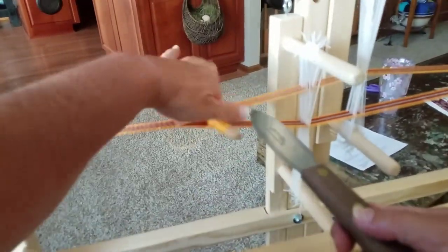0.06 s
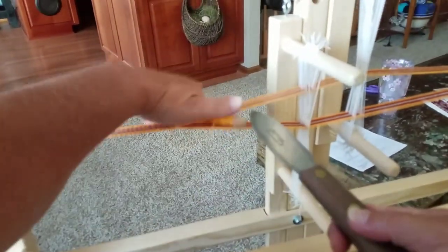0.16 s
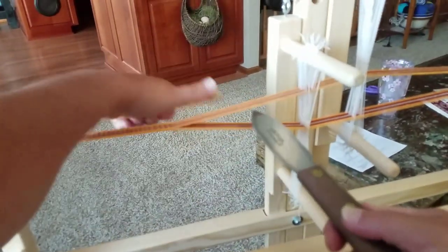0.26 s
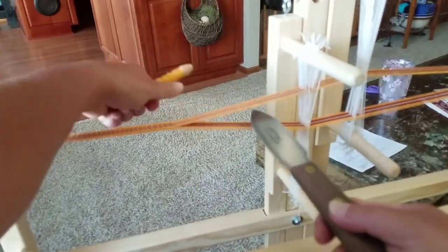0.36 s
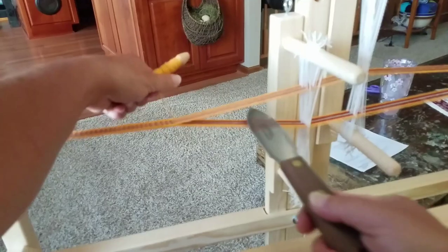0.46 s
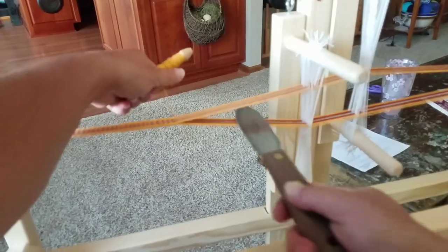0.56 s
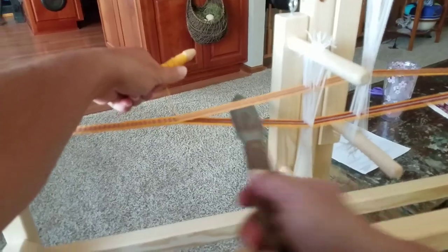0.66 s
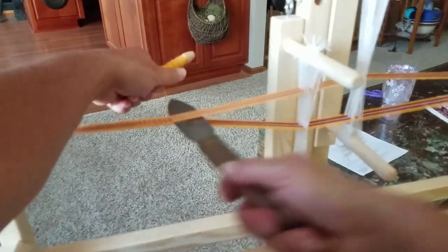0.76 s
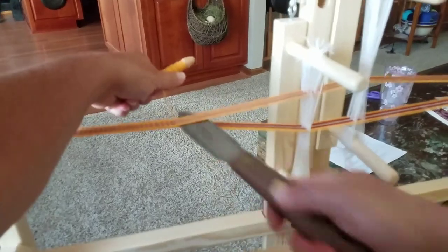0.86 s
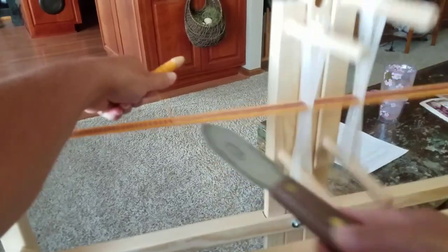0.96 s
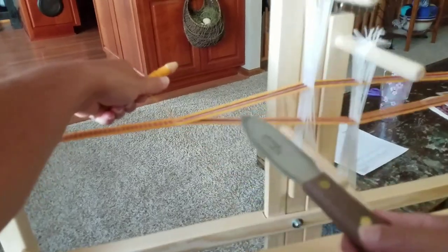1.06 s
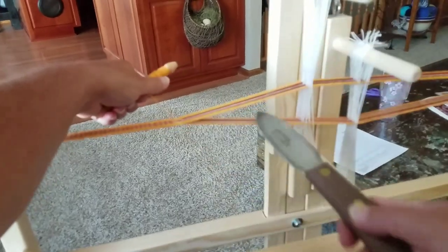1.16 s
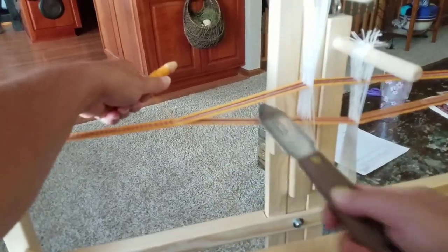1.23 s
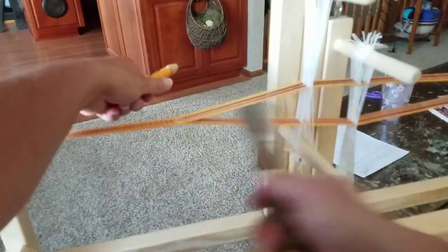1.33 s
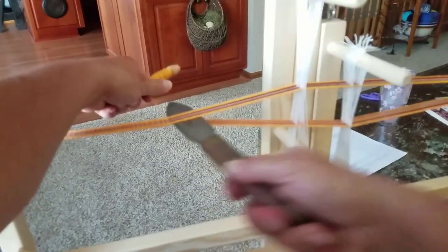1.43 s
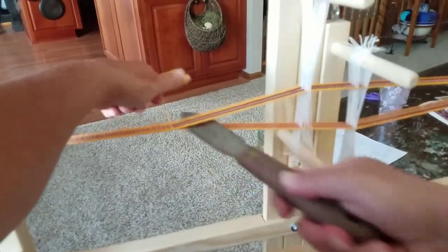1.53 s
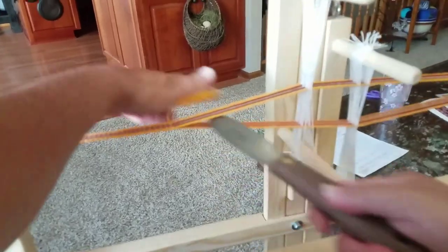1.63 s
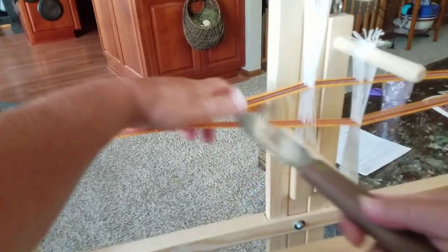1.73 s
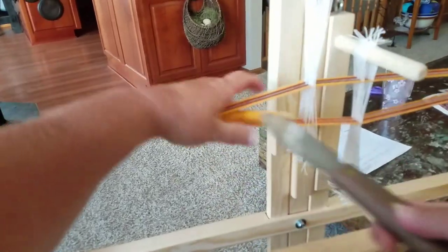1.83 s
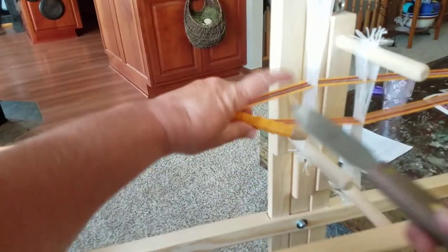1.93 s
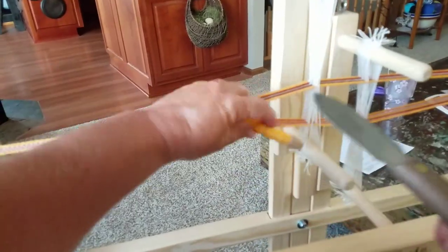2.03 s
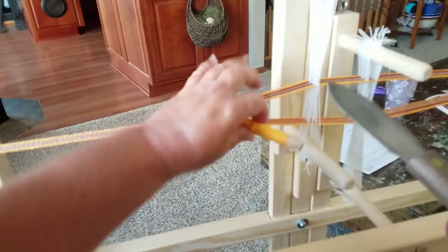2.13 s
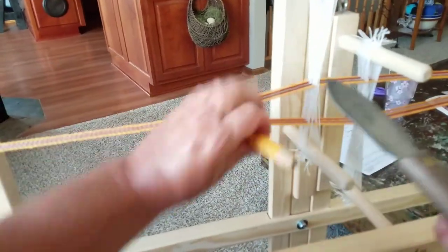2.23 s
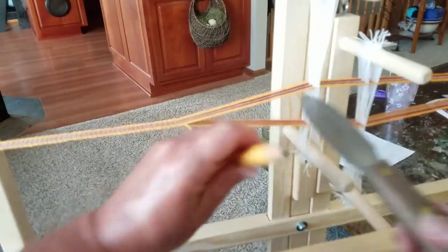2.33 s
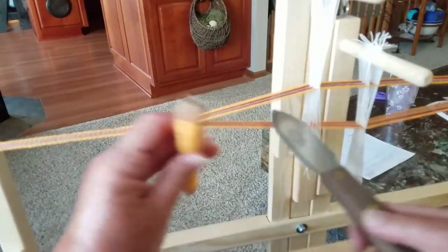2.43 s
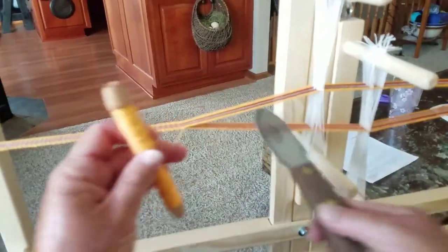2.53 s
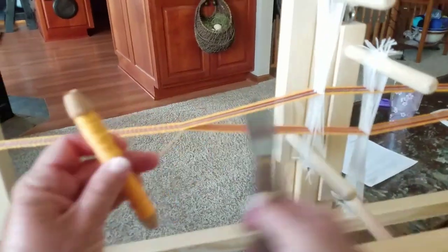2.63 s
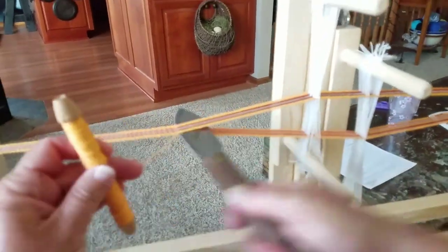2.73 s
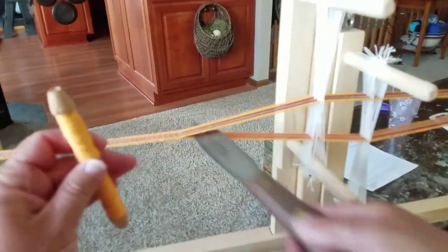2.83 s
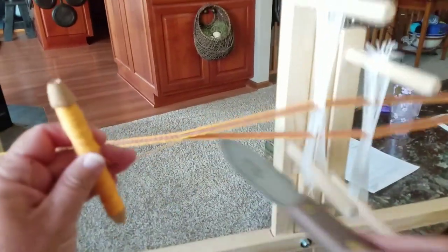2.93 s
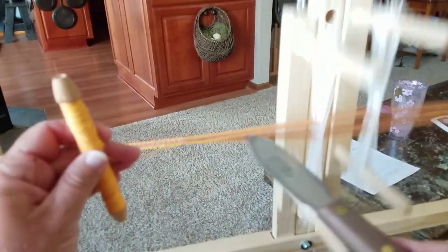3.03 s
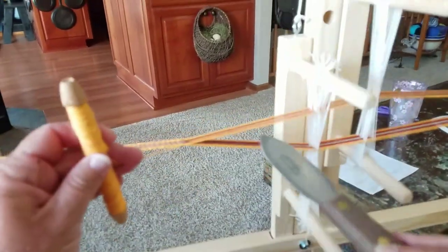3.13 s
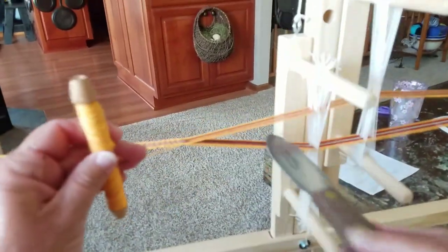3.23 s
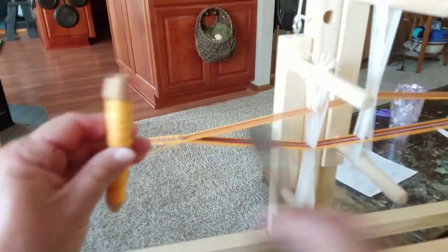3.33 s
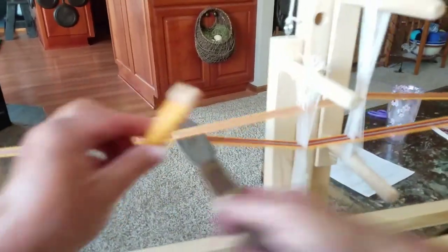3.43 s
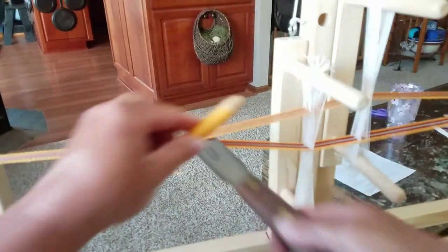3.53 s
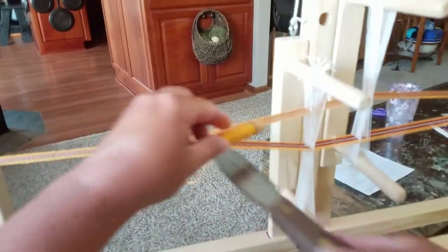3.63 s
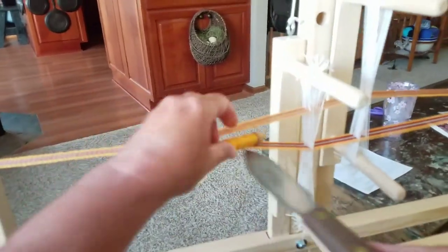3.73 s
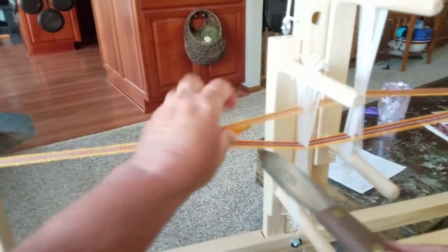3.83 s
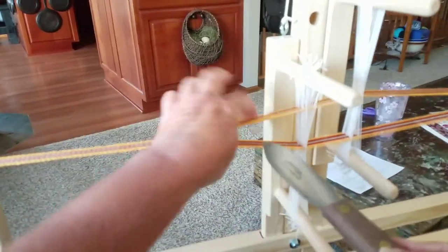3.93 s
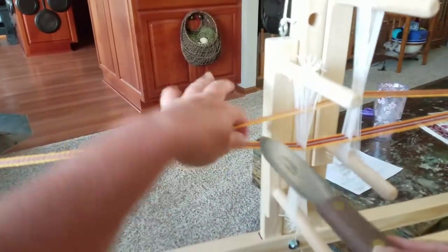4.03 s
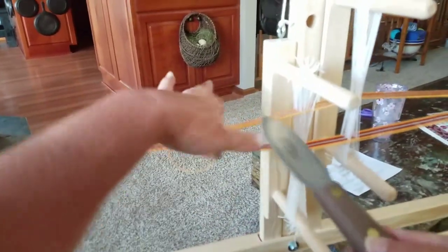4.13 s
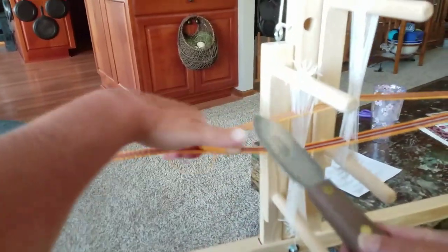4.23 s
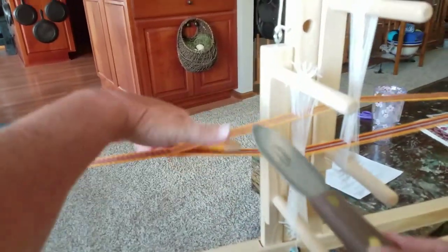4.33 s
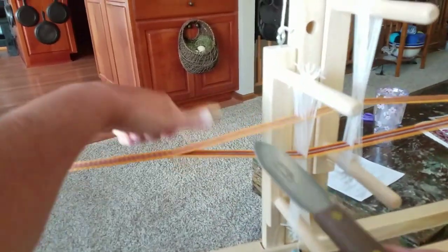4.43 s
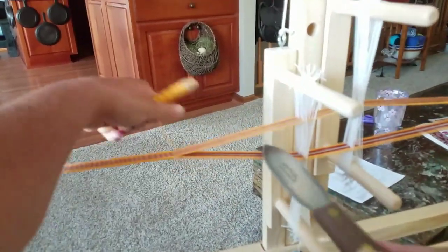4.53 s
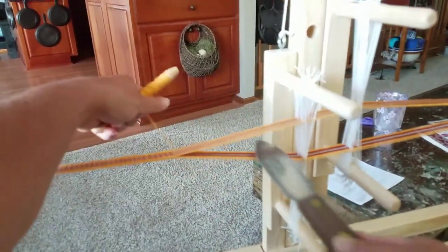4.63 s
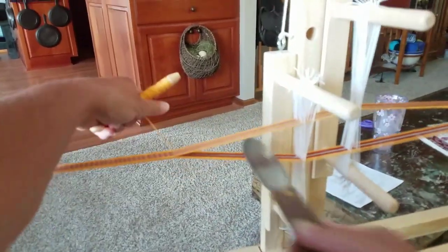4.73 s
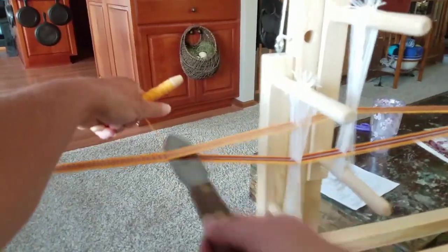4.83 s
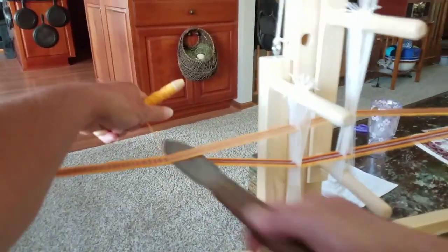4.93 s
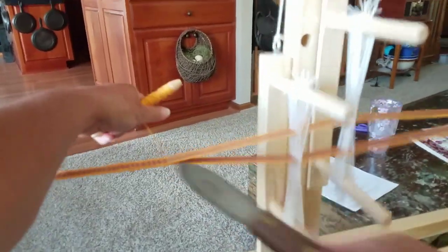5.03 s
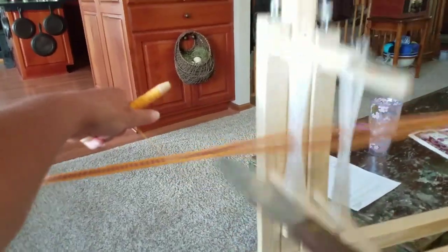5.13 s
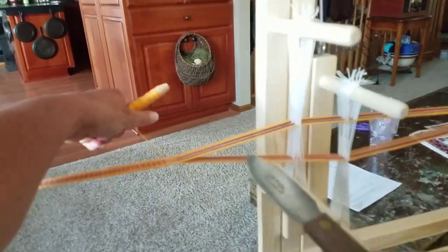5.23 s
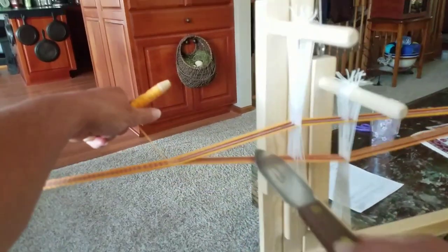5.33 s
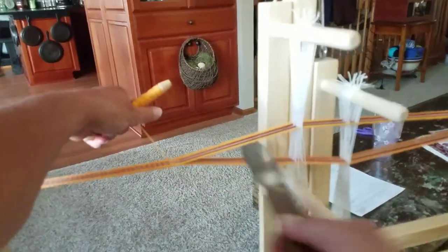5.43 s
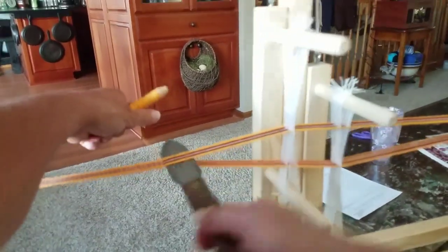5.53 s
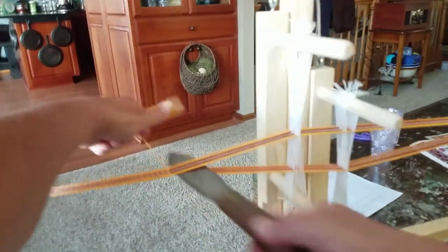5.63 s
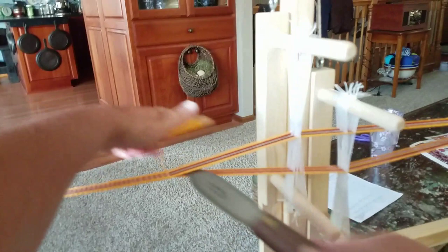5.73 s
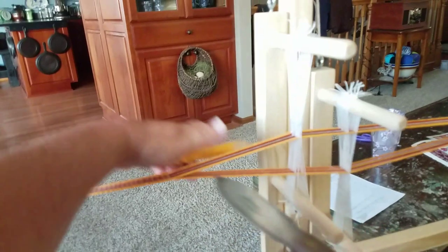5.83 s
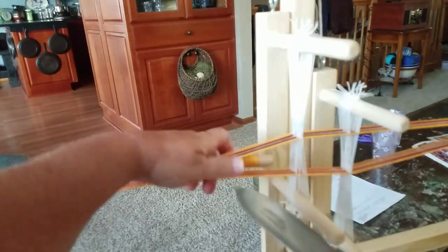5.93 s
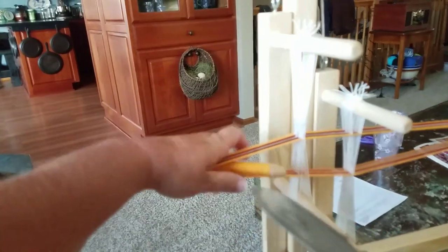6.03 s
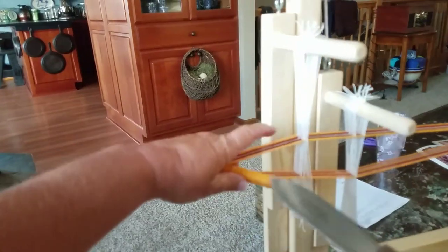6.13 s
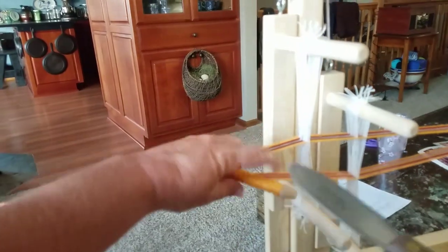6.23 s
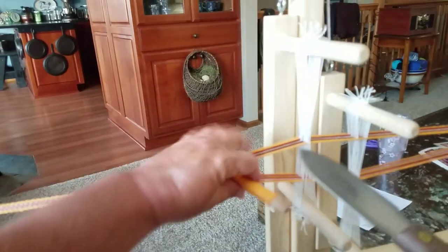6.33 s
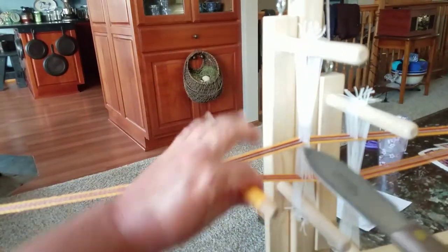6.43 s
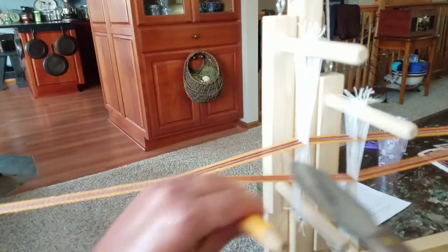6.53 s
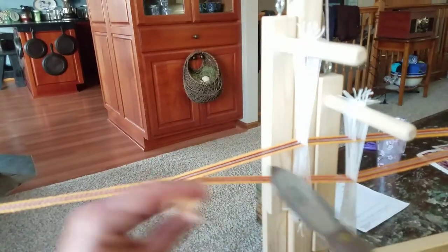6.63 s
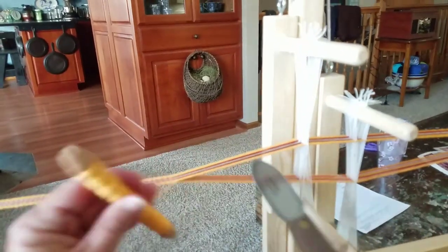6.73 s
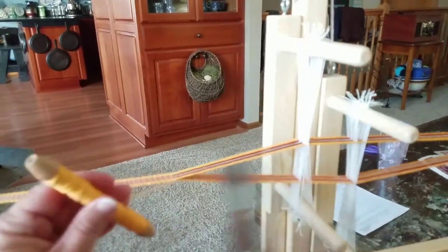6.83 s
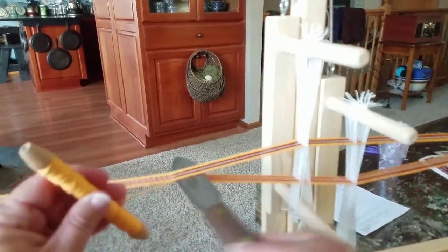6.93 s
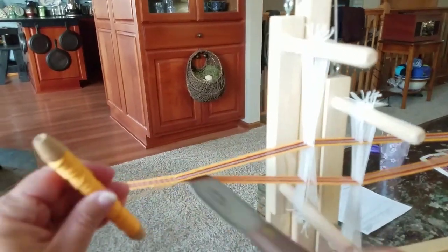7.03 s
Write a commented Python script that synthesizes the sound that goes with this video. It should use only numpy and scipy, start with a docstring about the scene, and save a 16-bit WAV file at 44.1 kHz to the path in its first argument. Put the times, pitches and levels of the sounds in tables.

```python
"""A small wooden loom weaves a band in a quiet, carpeted room. A knife-shaped beater swishes into the shed and
knocks the weft home: damped modes ring in the frame until the blade rebounds and checks most of the motion.
Between beats, shaped friction noise gives the scrape of heddles in the warp and the rustle of yarn;
the heddle bar hums and knocks, and blade and shuttle tick. A diffuse echo and still air surround the loom."""
import sys
import numpy as np
from scipy import signal
from scipy.fft import rfft, irfft
from scipy.io import wavfile
from scipy.ndimage import uniform_filter1d

SR = 44100
rng = np.random.default_rng(int(sys.argv[2]) if len(sys.argv) > 2 else 0)


def to_wav(sig):
    """Store sig (one row per channel, or 1-D mono) as 16-bit WAV at the path in sys.argv[1].

    Samples outside -1..1 are clipped; the rate is SR.
    """
    pcm = np.clip(np.atleast_2d(sig), -1, 1) * 32767
    pcm = np.round(pcm).astype(np.int16)
    wavfile.write(sys.argv[1], SR, pcm.T)  # frames by channels


N = 311346
T = np.arange(N) / SR
HZ = np.maximum(np.arange(N // 2 + 1) * SR / N, 1)
STROKE_T = T[:SR // 2]  # time axis of one struck sound, s
APART_HZ = 2250  # around this frequency the two ears' sounds of the loom become unrelated


def amp(db):
    """Level law: decibels to amplitude gain."""
    return 10 ** (np.asarray(db) / 20)


def unit(x):
    """Normalisation: scale to rms 1."""
    return x / np.sqrt(np.mean(x ** 2))


def colour(x, points):
    """Linear filtering: gain interpolated between (f/Hz, level/dB) points on a log-frequency axis."""
    hz, db = np.transpose(points)
    gain = amp(np.interp(np.log(HZ), np.log(hz), db))
    return irfft(rfft(x) * gain, N)


def grains(spread_db):
    """Granular friction: dense slips of fibre on fibre, their sizes scattered in dB."""
    size_db = spread_db * rng.standard_normal(N // 16 + 1)
    sizes = np.repeat(amp(size_db), 16)[:N]  # each size lasts 16 samples
    return sizes * rng.standard_normal((2, N))


def catches(depth_db):
    """Stick-slip: uneven gain of threads that catch and slip every few milliseconds."""
    unevenness = uniform_filter1d(rng.standard_normal(N), size=300)
    return amp(depth_db * unit(unevenness))


def stereo(pair, apart_hz):
    """Interaural coherence: two unrelated signals made alike in the bass, less and less above apart_hz."""
    alike = .85 / (1 + (HZ / apart_hz) ** 2)
    mid, side = rfft(pair) * np.sqrt([1 + alike, 1 - alike])
    return irfft(np.array([mid + side, mid - side]), N) / np.sqrt(2)


def friction(points, spread_db):
    """Broadband friction: steady rubbing with the given spectrum, rms 1."""
    return unit(colour(stereo(grains(spread_db), APART_HZ), points))


def ring(modes, tilt_db=0, detune=0):
    """Modal superposition: decaying sines of a struck object, high modes out of step between the ears."""
    out = 0
    for k, (hz, db, t60) in enumerate(modes):
        drift, skew = rng.standard_normal(2)
        lag = np.array([[.5], [-.5]]) * skew * min(hz / APART_HZ, 1) * 2  # phase, rad
        tilt = tilt_db * np.log2(hz / 600)  # tilt_db is per octave
        decay = amp(db + tilt - 60 * STROKE_T / t60)
        phase = 2 * np.pi * hz * (1 + detune * drift) * STROKE_T + lag
        out = out + (-1) ** k * decay * np.sin(phase)
    levels_db = np.array(modes)[:, 1]
    return out / np.sqrt(np.sum(amp(levels_db) ** 2) / 2)


def add(track, s, sound):
    """Linear superposition: mix a sound in at time s."""
    i = int(s * SR)
    track[:, i:i + sound.shape[1]] += sound[:, :N - i]


def swell(s, spread):
    """Gaussian envelope: a bell-shaped stroke around time s, with standard deviation spread in seconds."""
    return np.exp(-.5 * ((T - s) / spread) ** 2)


def pressed(t, hold, rise=.002, release=0.003, left_db=-14):
    """Contact damping: motion builds up, holds, and falls to left_db at the rebound."""
    held = np.exp(-np.maximum(t - hold, 0) / release)
    return np.clip(t / rise, 0, 1) * (held + amp(left_db) * (1 - held))


QUIET_DB, QUIET_APART_HZ = -63, 1030
# spectrum of the room's still air: (f/Hz, relative level per Hz/dB)
STILL_AIR_SPECTRUM = [(12, 7), (20, -24), (32, -15), (80, -15), (135, -6.5), (178, -13), (337, -4),
                      (511, -8.5), (674, -12.5), (914, -13.5), (1050, -16), (1140, -16), (2770, -21.5),
                      (15000, -31.5)]


def still_air():
    """Stationary noise: the steady, mostly low background of the room."""
    noise = stereo(rng.standard_normal((2, N)), QUIET_APART_HZ)
    return amp(QUIET_DB) * unit(colour(noise, STILL_AIR_SPECTRUM))


# yarn drawn off the shuttle: (t/s, level/dB, standard deviation of the stroke/s)
YARN_PULLS = [(0.196, -60.5, 0.014), (1.666, -66, 0.03), (2.208, -72.5, 0.14), (4.202, -62.5, 0.11),
              (4.378, -61.5, 0.04), (6.395, -64.5, 0.08), (6.475, -58, 0.021)]
# spectrum of yarn sliding over fingers and warp: (f/Hz, relative level per Hz/dB)
YARN_SPECTRUM = [(100, -30), (350, 10.5), (600, 5.5), (830, 5), (1200, 4), (1600, -9), (2800, -2),
                 (5000, -18), (8000, -15.5), (14500, -13.5)]


def yarn():
    """Stick-slip friction: yarn slides and catches in the fingers with each pull."""
    pull = sum(amp(db) * swell(s, spread) for s, db, spread in YARN_PULLS)
    return pull * catches(depth_db=1.5) * friction(YARN_SPECTRUM, spread_db=2.5)


# reverberation in overlapping bands: (centre f/Hz, t60/s, level/dB)
ROOM_BANDS = [(60, 0.38, -8), (143, 0.44, 6), (244, 0.4, -2.5), (540, 0.33, -7), (1020, 0.38, -10),
              (2160, 0.41, -18.5), (4530, 0.3, -6), (8000, 0.31, -9.5)]


def room(x, first_s=0.0059, apart_hz=700):
    """Diffuse reverberation: the left signal convolved with noise that decays at its own rate in each band."""
    air, echo = rfft(stereo(rng.standard_normal((2, N)), apart_hz)), 0
    centres = np.log([row[0] for row in ROOM_BANDS])
    for share, (hz, t60, db) in zip(np.eye(len(ROOM_BANDS)), ROOM_BANDS):
        onset = np.clip(T / first_s - 1, 0, 1)  # silent until first_s, full at twice that
        fade = amp(-60 * T / t60) * onset
        band = irfft(air * np.interp(np.log(HZ), centres, share), N)
        echo = echo + amp(db) * band * fade / np.sqrt(np.sum(fade ** 2))
    return signal.fftconvolve(x[:1], echo[:, :SR], axes=1)[:, :N]


# modes of the blade: (f/Hz, relative level/dB, t60/s)
BLADE_MODES = [(1012, -2, 0.046), (1490, -16, 0.018), (2054, 0.5, 0.053), (2350, -2.5, 0.066),
               (2600, -9, 0.037), (3450, -37, 0.023), (4126, -1.5, 0.042), (5450, -11, 0.063)]


def tap(ring_db, snap_db):
    """Impact excitation: a dry snap, a short woody clack and the modal ring of the blade."""
    snap, clack = rng.standard_normal((2, 2, len(STROKE_T)))
    wood = signal.butter(2, [600, 3400], "band", fs=SR, output="sos")
    clack = signal.sosfilt(wood, clack) * np.exp(-STROKE_T / .0035)
    body = amp(-13) * ring(BLADE_MODES, detune=.02) + clack
    return amp(ring_db) * body + amp(snap_db) * snap * np.exp(-STROKE_T / 0.0011)


FIRM_DB, USUAL_HOLD_S = -26, .02  # reference beat
HARDNESS_DB, HARDNESS_SLOPE = 0.2, 0.35  # tilt of a firm beat, dB per octave; its change per dB of force
CHATTER_DB, CHATTER_SLOPE = -31.5, 0.69  # thread chatter of a firm beat; dB per dB of force
REBOUND_DB, REBOUND_SLOPE_DB = -32, 24  # rebound click after the usual hold; gain per doubling of the hold
CHATTER_FADE_S, DOWEL_LAG_S = 0.03, 0.0074
SWISH_IN_DB, SWISH_RISE_S, SWISH_STOP_S = -42.5, 0.017, 0.0061  # the blade slides in
SWISH_OUT_DB, GRAZE_DB, WITHDRAW_S, WITHDRAW_SPREAD_S = -59.5, -55, 0.11, 0.034  # and is drawn back
# beats, a firm one before each change of shed and a light one after:
# (t/s, knock level/dB, time pressed home/s, dowel rattle level/dB)
BEATS = [(0.7385, -24.5, 0.017, -27.5), (1.3975, -33, 0.019, -46), (2.7030, -27.5, 0.023, -48),
         (3.3990, -35, 0.01, -58), (4.8545, -26, 0.02, -29), (5.5270, -36.5, 0.019, -44),
         (6.8927, -26.5, 0.02, -56)]
# modes of the frame under the warp: (f/Hz, relative level/dB, t60/s)
FRAME_MODES = [(117.9, -19, 0.73), (153.3, -27, 0.93), (178.4, -12.5, 0.37), (238.2, -3, 0.32),
               (332, -4, 0.62), (375.3, -5.5, 0.42), (486, 6, 0.1), (582, -0.5, 0.58), (679, 9.5, 0.066),
               (757.6, 5.5, 0.079), (854, -1.5, 0.18), (991, -7.5, 0.29), (1150, -20.5, 0.52),
               (1268, -10, 0.44), (1860, -26, .15), (2180, -16.5, 0.46), (2824, -9.5, 0.047),
               (4190, -19, 0.15)]
# modes of the loose warp dowel: (f/Hz, relative level/dB, t60/s)
DOWEL_MODES = [(993, -6, 0.1), (1598, 3.5, 0.077), (1660, -8, 0.13), (2150, -4, 0.13), (2586, -5, 0.069)]
# spectrum of the blade chattering on the threads: (f/Hz, relative level per Hz/dB)
CHATTER_SPECTRUM = [(50, -38), (120, -30), (250, -5.5), (700, 2.5), (1100, 6), (1380, -11), (1800, -2.5),
                    (2700, -10.5), (3500, -15), (5500, -23.5), (8000, -40.5), (15000, -37)]
# spectrum of the blade sliding along the threads: (f/Hz, relative level per Hz/dB)
SWISH_SPECTRUM = [(100, -16), (400, 9), (850, -1.5), (1250, 5), (1600, -6), (2600, 1), (4000, -10.5),
                  (5500, -11.5), (7500, -8.5), (10000, -16.5), (14500, -7)]


def beater():
    """Impact and sliding friction: a gathering swish, a knock with chattering threads, a softer swish back."""
    out, chatter, slide = np.zeros((2, N)), np.zeros((1, N)), np.zeros(N)
    for s, db, hold, rattle_db in BEATS:
        # a firmer beat is brighter and makes the threads chatter more
        force_db = db - FIRM_DB
        hard_db = HARDNESS_DB + HARDNESS_SLOPE * force_db
        chatter_db = CHATTER_DB + CHATTER_SLOPE * force_db
        # the stiffening warp limits the frame's swing
        swing = 1.8 * np.tanh(ring(FRAME_MODES, hard_db, detune=.012) / 1.4)
        add(out, s, amp(db) * swing * pressed(STROKE_T, hold, rise=0.00053, left_db=-15.5))
        buzzing = pressed(STROKE_T, hold, rise=0.0012, left_db=-7.0) * np.exp(-STROKE_T / CHATTER_FADE_S)
        add(chatter, s, amp(chatter_db) * buzzing[None])
        # the jerk runs down the warp and rattles the dowel a moment later
        rattle = ring(DOWEL_MODES, detune=0.0056) * pressed(STROKE_T, hold, rise=0.0059)
        add(out, s + DOWEL_LAG_S, amp(rattle_db) * rattle)
        # the blade clicks as it meets the weft
        add(out, s + 0.0019, tap(ring_db=-48, snap_db=SWISH_IN_DB))
        # the longer it is pressed, the harder it rebounds
        rebound_db = REBOUND_DB + REBOUND_SLOPE_DB * np.log2(hold / USUAL_HOLD_S)
        add(out, s + 0.96 * hold, tap(rebound_db, snap_db=-59))
        # on its way out it grazes the threads
        add(out, s + WITHDRAW_S, tap(GRAZE_DB, snap_db=-52))
        reach = np.abs(T - s) / np.where(T < s, SWISH_RISE_S, SWISH_STOP_S)
        slide += amp(SWISH_IN_DB) * np.exp(-reach ** 0.95)
        slide += amp(SWISH_OUT_DB) * swell(s + WITHDRAW_S, WITHDRAW_SPREAD_S)
    swish = friction(SWISH_SPECTRUM, spread_db=1.2)
    buzz = friction(CHATTER_SPECTRUM, spread_db=1.5)
    return out + chatter * buzz + slide * swish


SHED_RISE_S, SHED_FALL_S = 0.15, 0.093  # time to gain and to lose 20 dB
HUM_DB = 1  # peak hum of the bar relative to the scrape
BOUNCE_S, BOUNCE_DB = 0.022, -8.5  # spacing of the bar's bounces; level change at each
# changes of shed, fastest just as the bar seats: (t/s, scrape level/dB, knock level/dB)
SHEDS = [(1.0215, -41.5, -24.5), (3.039, -43, -31.5), (5.147, -41, -29)]
# spectrum of threads dragged through the heddles: (f/Hz, relative level per Hz/dB)
SCRAPE_SPECTRUM = [(100, -53), (230, -13), (380, 1), (600, -0.5), (1150, 3), (1400, -8), (2000, -2.5),
                   (3000, -8.5), (4500, -16.5), (8000, -17.5), (10000, -24.5), (14500, -17)]
# modes of the heddle bar: (f/Hz, relative level/dB, t60/s)
BAR_MODES = [(217, -23, 0.26), (526, 6, 0.061), (588, -0.5, 0.025), (1100, -19.5, 0.063), (1694, -3, 0.043),
             (2150, -2.5, 0.083), (2720, -7, 0.072), (3400, -9, 0.058)]
# slight spectral trim of the bar's sound: (f/Hz, level/dB)
BAR_TRIM = [(60, 0), (200, -0.5)]


def heddles():
    """Friction-driven resonance: uneven scraping sets the bar humming; it knocks as it seats and bounces twice."""
    scrape, hum, knocks = np.zeros(N), np.zeros(N), np.zeros((2, N))
    seat = pressed(STROKE_T, .008, rise=.003, left_db=-10)
    for s, scrape_db, knock_db in SHEDS:
        rise, fall = (s - T) / SHED_RISE_S, ((T - s) / SHED_FALL_S) ** 2
        speed = amp(-20 * np.where(T < s, rise, fall))
        scrape += amp(scrape_db) * speed
        # the bar hums mostly while the threads drag hard
        hum += amp(scrape_db + HUM_DB) * speed ** 1.4
        for k in range(3):
            knock = ring(BAR_MODES, tilt_db=-4.0, detune=0.0069) * seat
            add(knocks, s + k * BOUNCE_S, amp(knock_db + k * BOUNCE_DB) * knock)
    drive = rng.standard_normal((1, N))
    bar = unit(signal.fftconvolve(drive, ring(BAR_MODES), axes=1)[:, :N])
    rubbing = catches(depth_db=0.65) * scrape * friction(SCRAPE_SPECTRUM, spread_db=2.5)
    return rubbing + colour(hum * bar + knocks, BAR_TRIM)


# light taps of blade, bar and shuttle: (t/s, ring level/dB, snap level/dB)
TICKS = [(1.513, -37, -62), (3.0392, -30.5, -51), (4.085, -40.5, -49), (5.247, -53, -54),
         (5.6506, -41, -57), (5.7285, -40, -70), (6.7407, -63, -50)]


def ticks():
    """Light impacts: brief contacts, each with its own balance of ring and snap."""
    out = np.zeros((2, N))
    for s, ring_db, snap_db in TICKS:
        add(out, s, tap(ring_db, snap_db))
    return out


BUMP_FADE_S = 0.11
# soft bumps against the frame: (t/s, level/dB)
BUMPS = [(1.517, -53), (6.742, -50.5), (6.756, -53)]


def bumps():
    """Soft excitation: the frame's modes ring with less treble and an added exponential fade."""
    out = np.zeros((2, N))
    fade = np.exp(-STROKE_T / BUMP_FADE_S)
    for s, db in BUMPS:
        add(out, s, amp(db) * ring(FRAME_MODES, tilt_db=-1.0, detune=0.019) * fade)
    return out


# the right microphone is shaded from the loom: (f/Hz, left minus right level/dB)
EAR_SHADE = [(200, -.8), (700, .3), (1400, -.3), (2500, 2), (5000, 5.5), (8500, 13), (11000, 9.5),
             (15000, 8)]


def shaded(x):
    """Acoustic shadow: half the level difference raises the left ear, half lowers the right."""
    ears = [colour(ear, [(hz, side * db) for hz, db in EAR_SHADE]) for ear, side in zip(x, (.5, -.5))]
    return np.array(ears)


def scene():
    """Direct and reverberant fields: the loom close by, its echo, and the still room."""
    knocks = yarn() + beater() + ticks() + bumps()
    shed = heddles()
    # the small heddle bar throws less sound into the room than the whole frame
    echo = room(knocks + amp(-1.0) * shed)
    return shaded(knocks + shed) + echo + still_air()


TOP_HZ = 14750


def record(dry):
    """Band limiting: a steep elliptic low-pass cuts the top above TOP_HZ."""
    low_pass = signal.ellip(10, .2, 70, TOP_HZ, fs=SR, output="sos")
    return signal.sosfilt(low_pass, dry)


dry = scene()
out = record(dry)
to_wav(out)
```